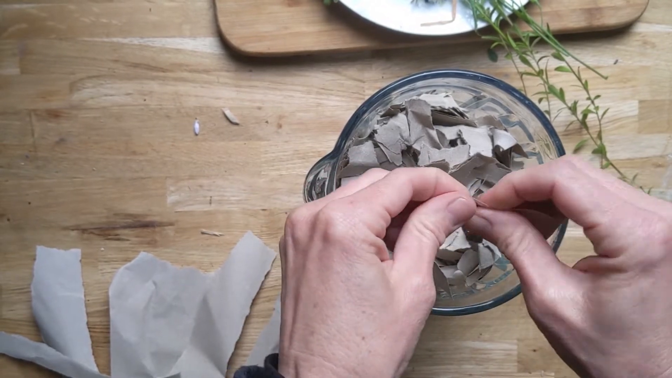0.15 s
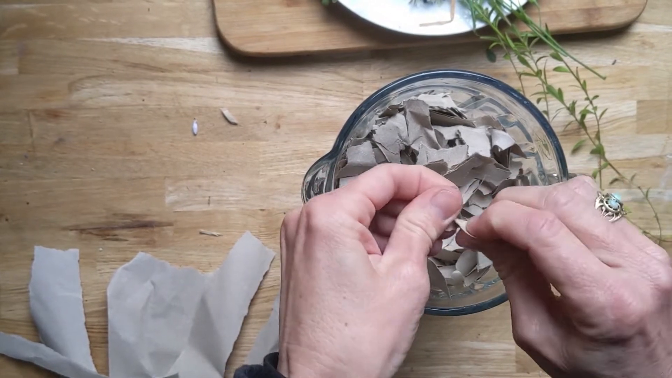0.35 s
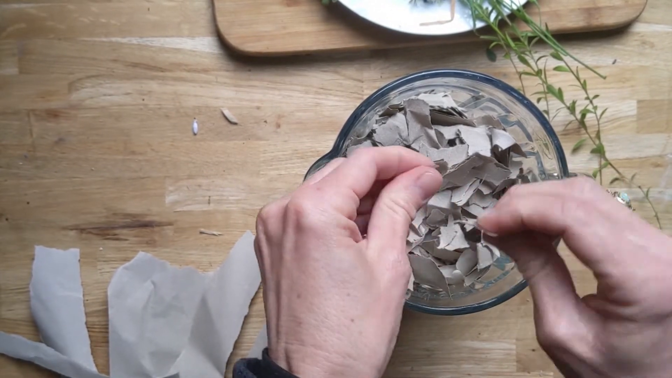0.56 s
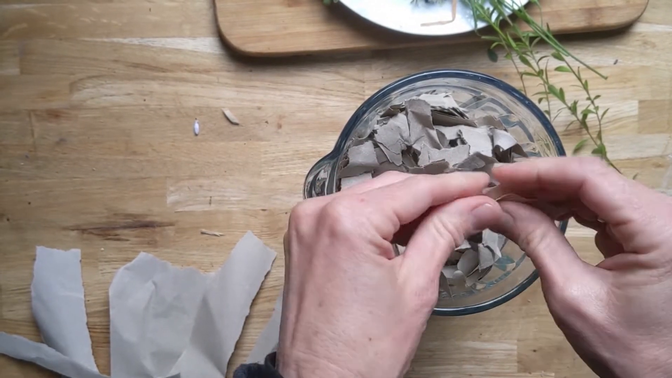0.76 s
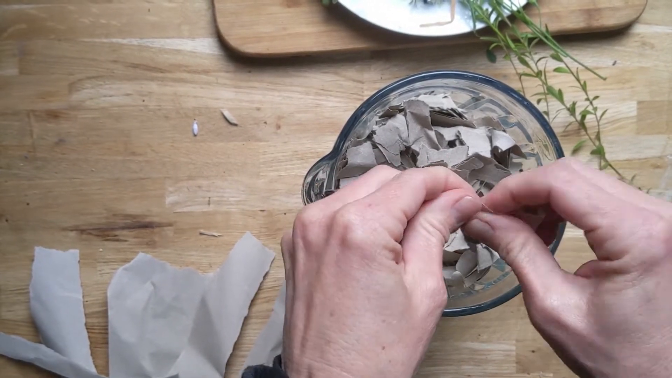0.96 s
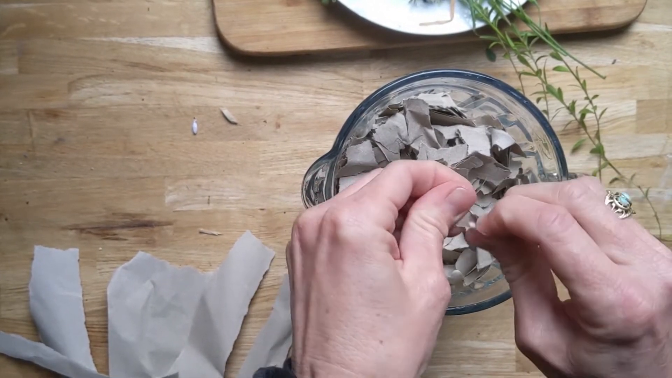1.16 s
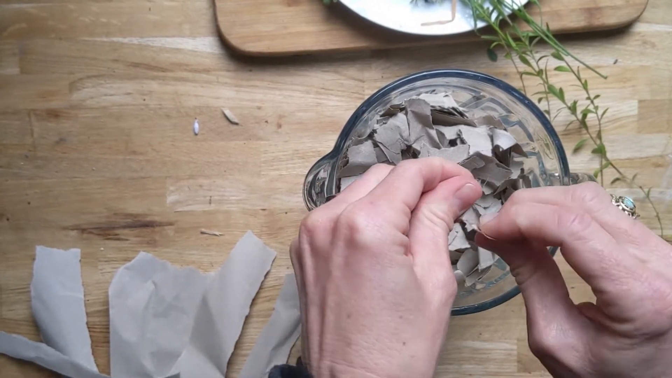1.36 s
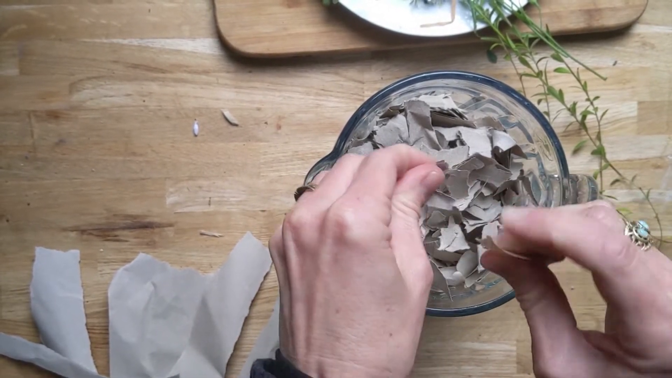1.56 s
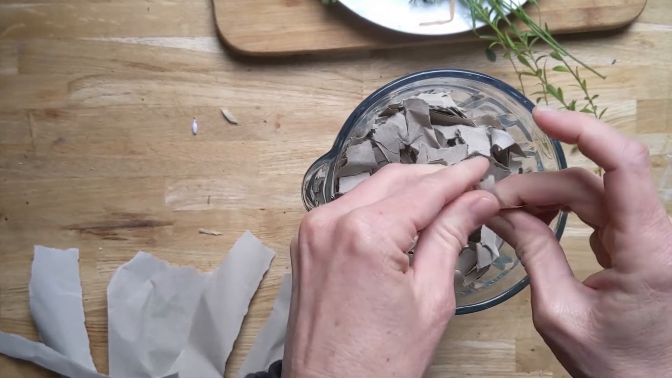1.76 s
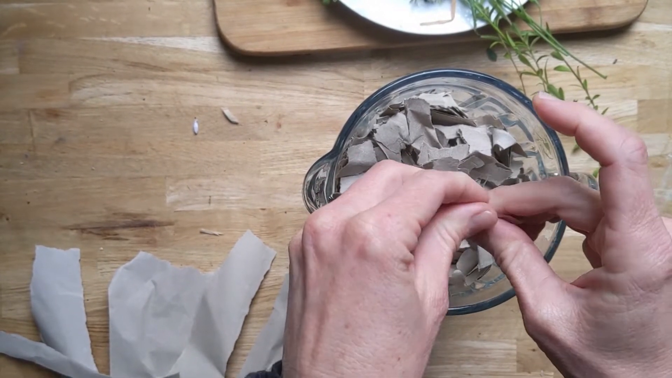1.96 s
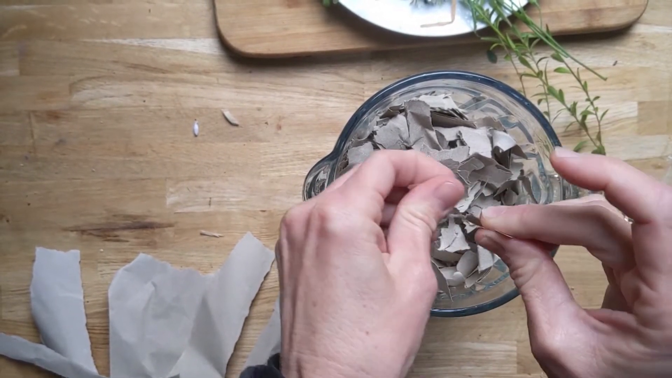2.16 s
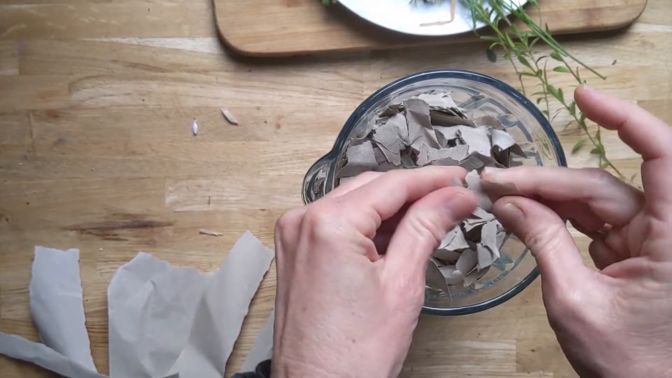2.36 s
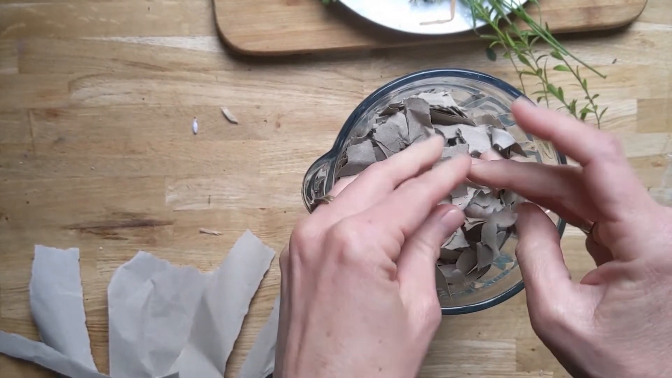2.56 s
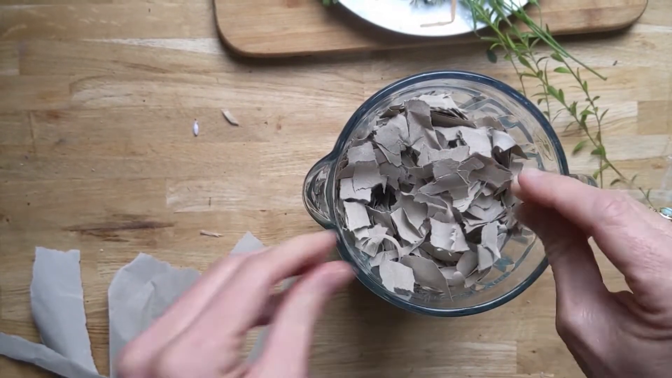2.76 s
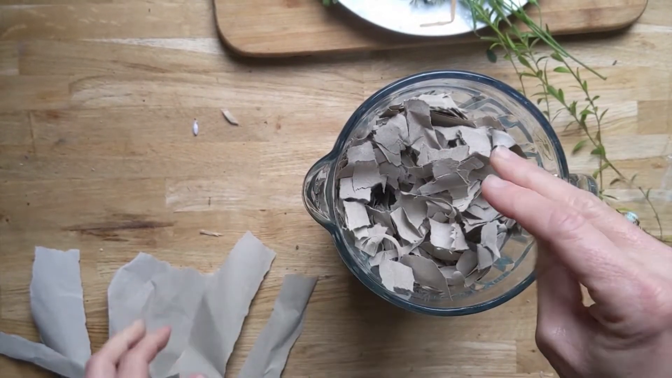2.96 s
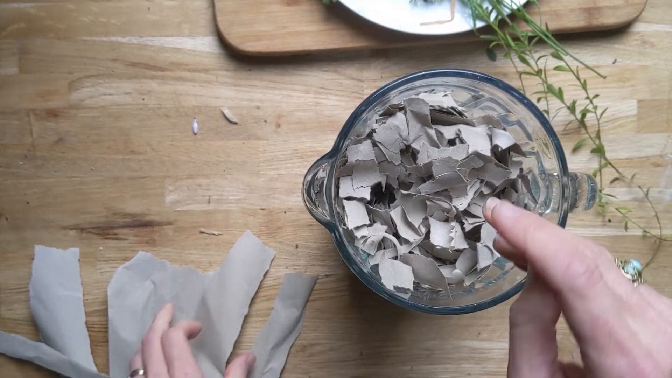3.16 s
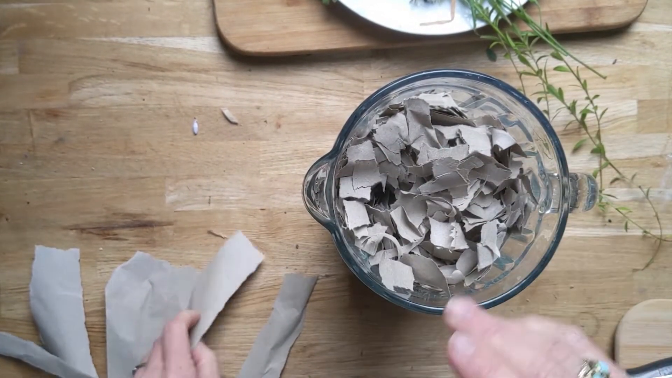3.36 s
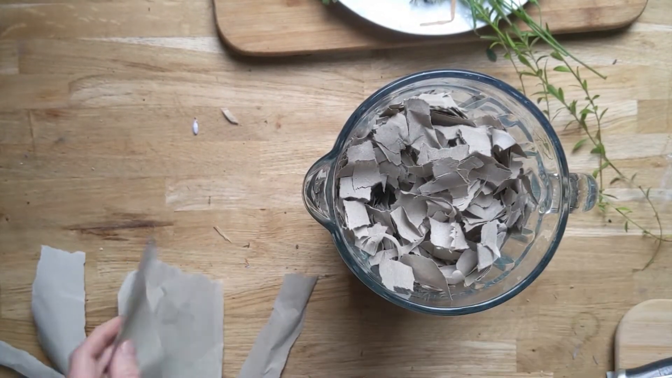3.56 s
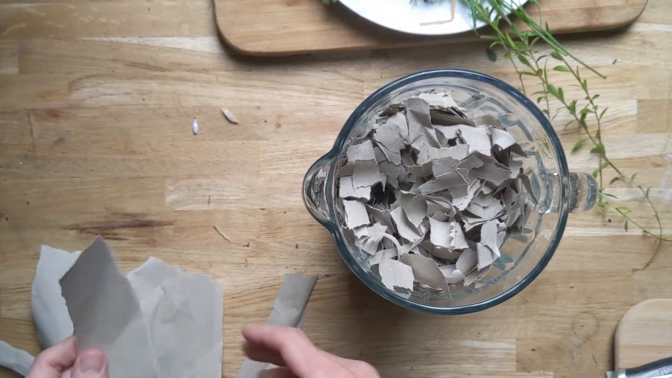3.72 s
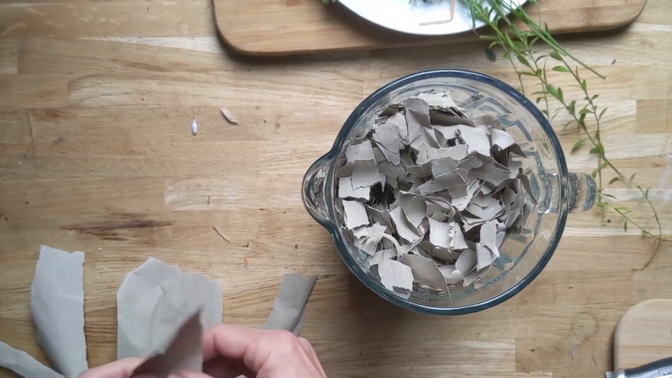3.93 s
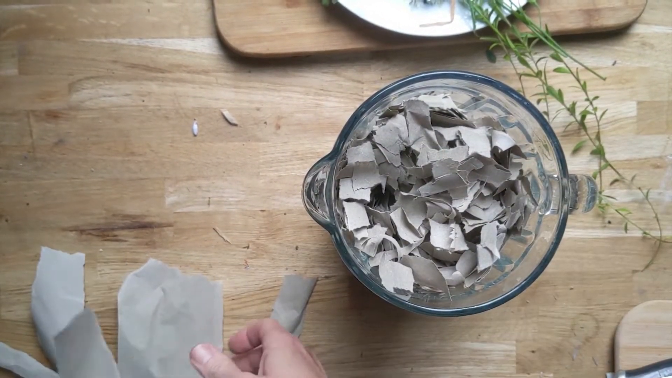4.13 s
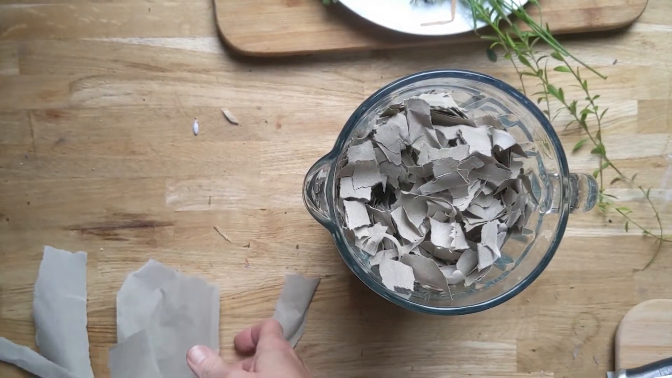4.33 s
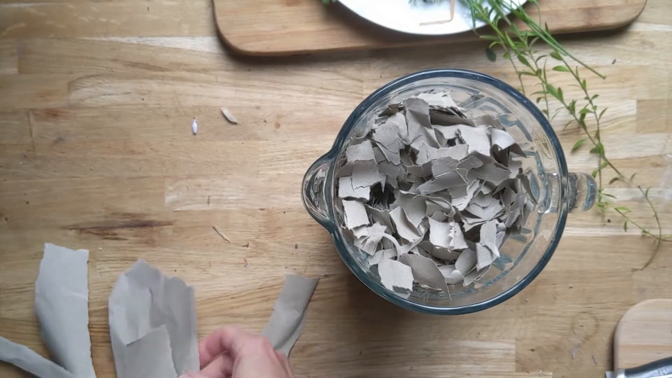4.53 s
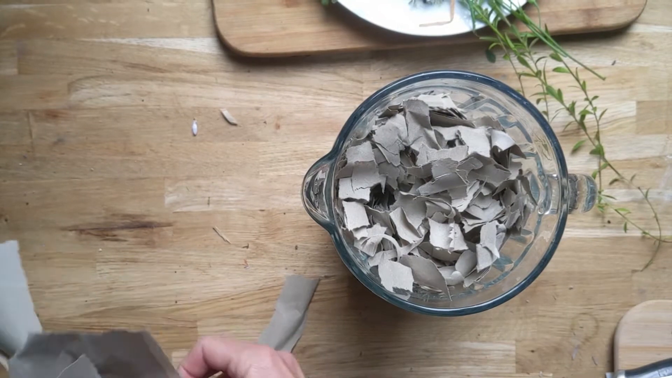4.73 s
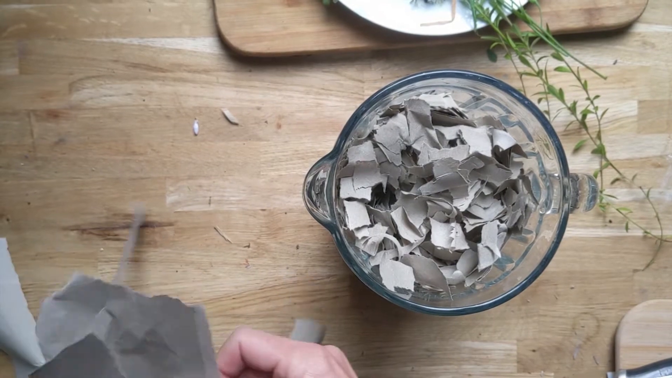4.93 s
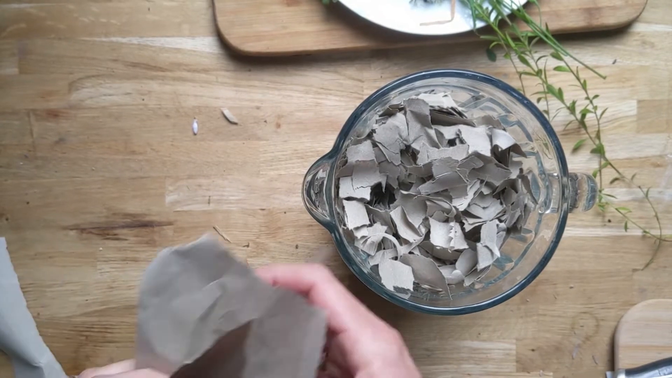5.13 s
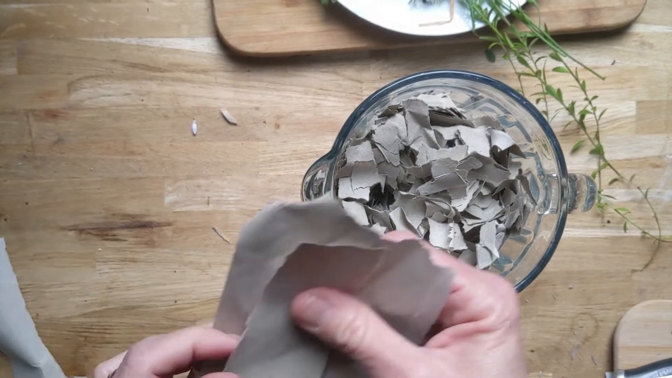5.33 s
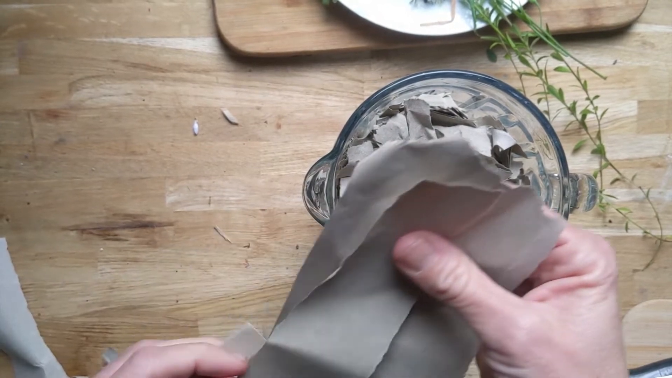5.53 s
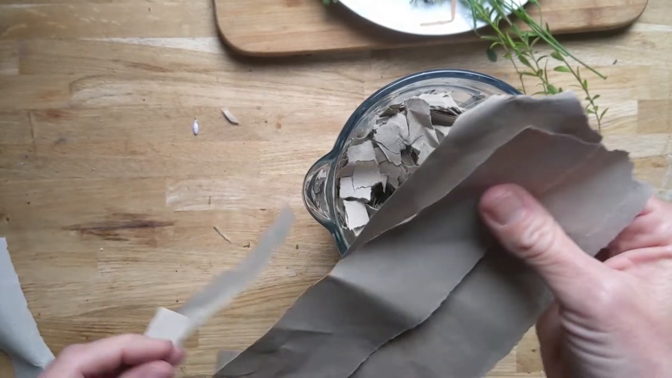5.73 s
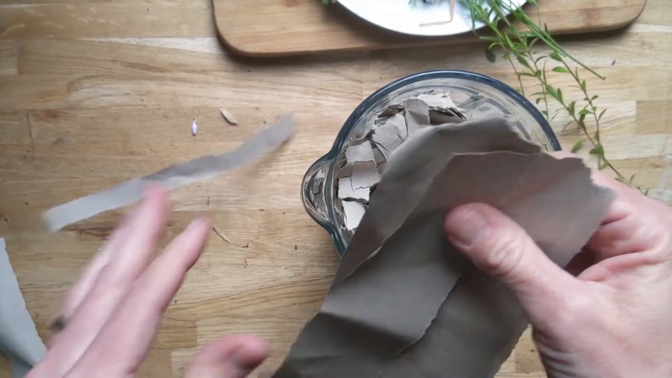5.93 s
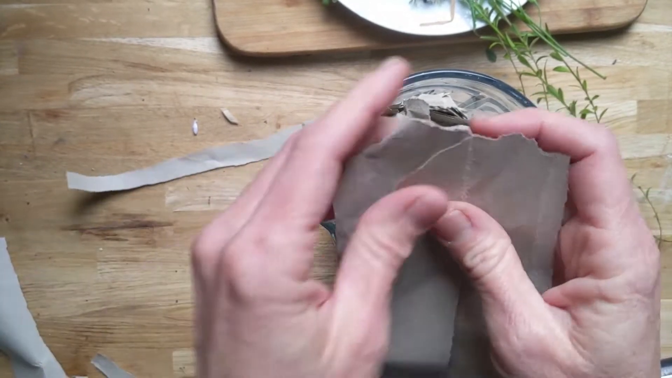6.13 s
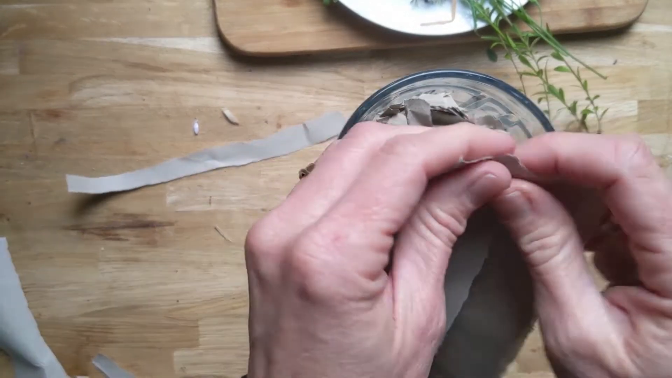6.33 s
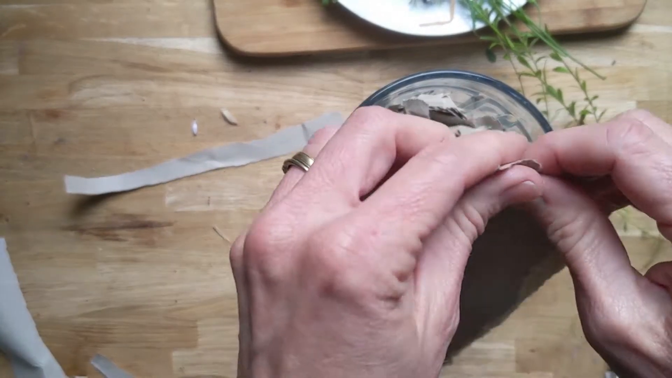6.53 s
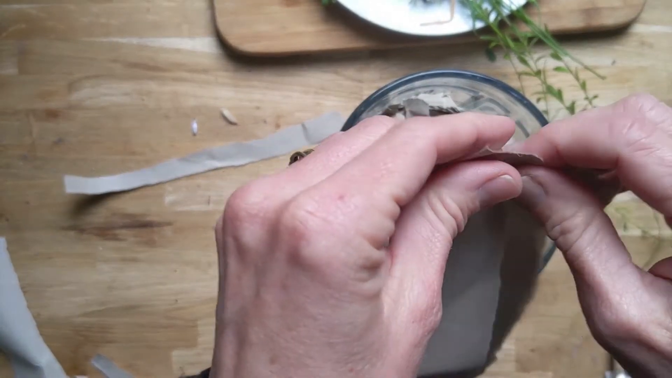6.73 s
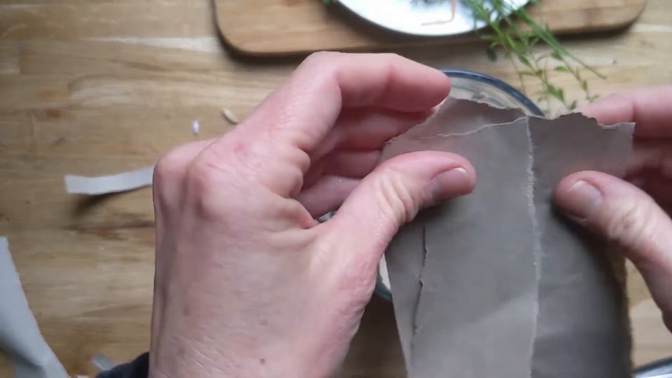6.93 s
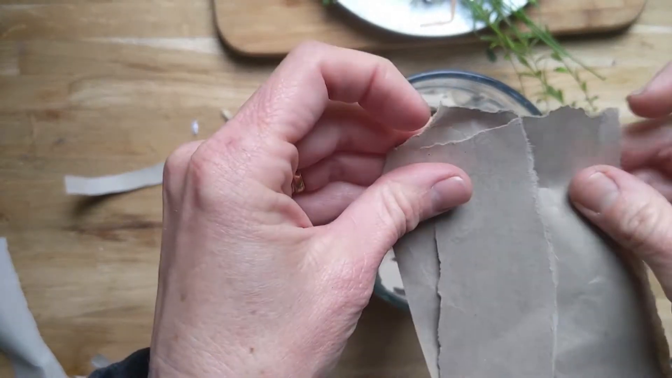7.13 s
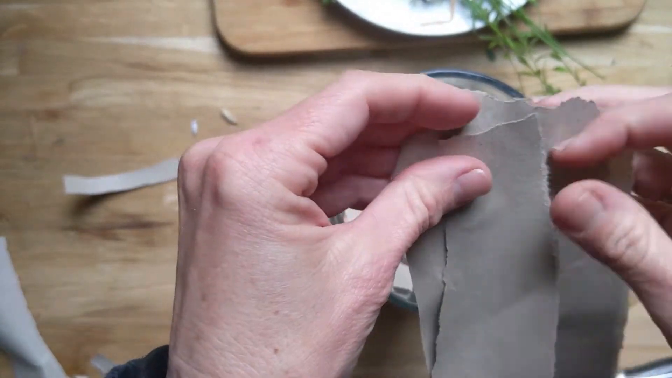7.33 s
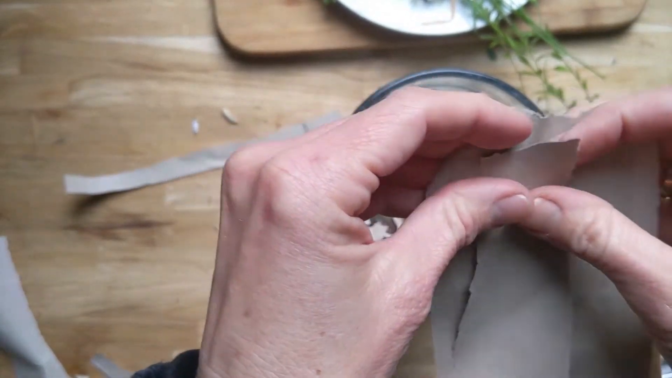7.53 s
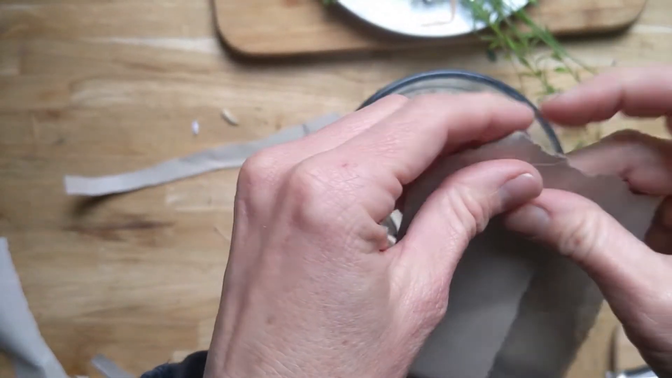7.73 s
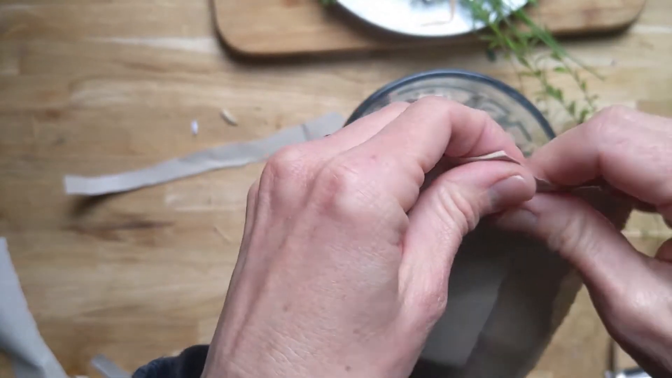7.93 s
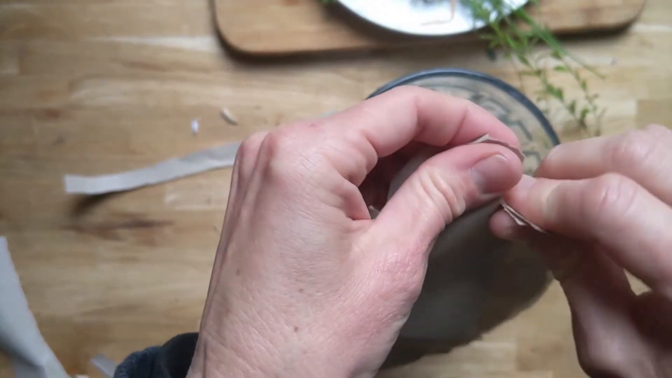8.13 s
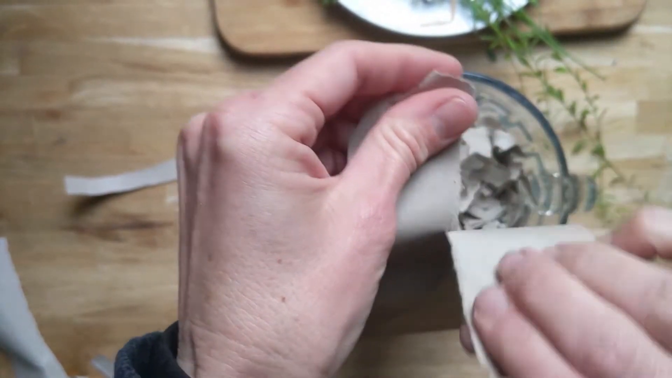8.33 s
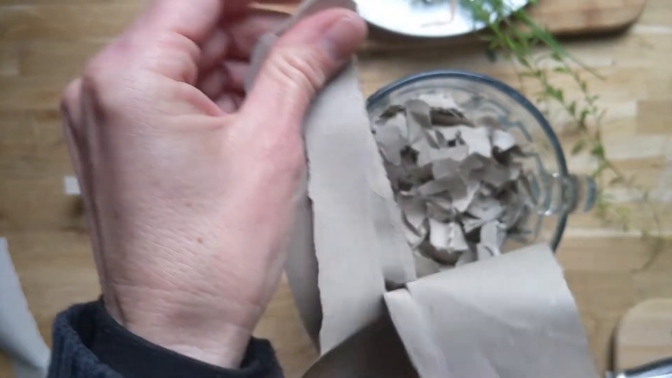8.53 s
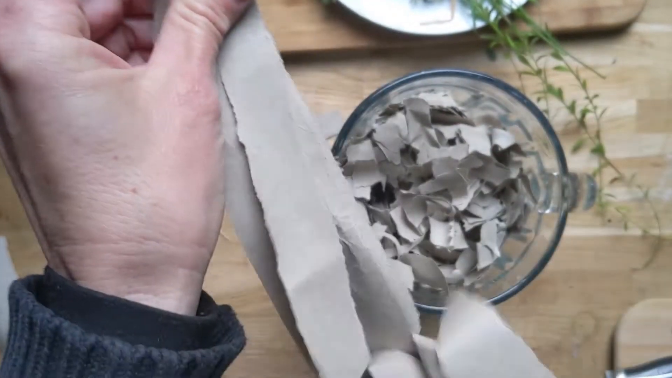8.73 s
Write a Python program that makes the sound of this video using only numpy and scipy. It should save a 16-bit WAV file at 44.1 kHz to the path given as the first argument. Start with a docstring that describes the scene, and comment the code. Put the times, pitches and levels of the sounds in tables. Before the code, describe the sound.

A close stereo phone microphone above a kitchen table, short dry room, very soft air noise and a low, faint appliance hum throughout. From 0 to 1.5 s, fingers tear small paper scraps: brief bright fizzy rips near 0.4, 1.2 and 1.4 s, with light rubbing and tiny ticks between. From 1.6 to 3.2 s it is almost silent, only faint rustles and a small tear near 2.1 s. At 3.3 s paper slides softly; from 3.9 to 5.6 s a larger sheet is picked up and bent, rustling and crinkling, with dry pops around 4.0, 4.9, 5.3 and 5.5 s. A quieter moment near 6 s, then folding: a loud crease snap at 6.85 s, dense crinkles and duller pops until 7.9 s. From about 8.2 s a long rip swells, coarse and crackling, with hard snaps at 8.4, 8.5, 8.6 and 8.8 s, still tearing at the end.

```python
"""Tearing and folding paper

Hands tear small paper scraps over a jug, pick up and fold a large sheet, then rip a long strip off it.
Snapping fibres are dense tiny clicks, filtered to the colour of paper and swelling with the hands' effort.
Creases pop as short noise jolts that ring the sheet; small dents ring its modes as crinkles.
A phone with two ports, close above the table, hears a small quiet kitchen: soft noise and an appliance hum."""
import sys
import numpy as np
from scipy import signal
from scipy.fft import rfft, irfft
from scipy.io import wavfile
from scipy.ndimage import uniform_filter1d

SR = 44100
rng = np.random.default_rng(int(sys.argv[2]) if len(sys.argv) > 2 else 0)


def convert_level_to_amplitude(level_db):
    """Map a level in decibels to its linear amplitude factor."""
    exponent = np.asarray(level_db, float) / 20
    return 10 ** exponent


def log_audio(samples):
    """Write samples as a 16-bit WAV file to the path given in sys.argv[1]."""
    # one column per channel
    frames = np.atleast_2d(samples).T
    # limit to full scale, then quantise
    limited = np.clip(frames, -1, 1)
    pcm = np.round(limited * 32767).astype(np.int16)
    wavfile.write(sys.argv[1], SR, pcm)


N = 391608

TIME_S = np.arange(N) / SR
FREQ_HZ = np.maximum(np.fft.rfftfreq(N, 1 / SR), 1)
SIDES = np.array([[1], [-1]])  # left port, right port
# ways the large sheet can ring: [f/Hz, level/dB, time to fall by 60 dB/s]
SHEET_MODES = [(567, -6, 0.018), (783, -5, 0.016), (1249, 0, 0.016), (1804, 2, 0.014), (2430, 1, 0.012),
               (3060, 0, 0.01), (4040, -1, 0.008), (4950, -7, 0.0066)]


def along(table):
    """Read a table of [f/Hz, value] at every frequency, evenly in pitch."""
    hz, value = np.transpose(table)
    return np.interp(np.log(FREQ_HZ), np.log(hz), value)


def shape(x, gain):
    """Filter a sound by a gain at every frequency."""
    return irfft(rfft(x) * gain, N)


def walk(rate):
    """Random levels that slide from one to the next, `rate` of them a second; spread near 1."""
    k = int(SR / rate)
    held = np.repeat(rng.standard_normal(N // k + 1), k)
    return 1.175 * uniform_filter1d(held, k)[:N]


def kitchen():
    """Broad room noise, alike at both ports in the bass, plus narrow wavering lines of an appliance."""
    # colour of the room noise: [f/Hz, relative level per Hz/dB]
    air_colour = [(12, -49), (24, 6.5), (34, -13), (60, 1), (88, -3.5), (123, -3), (209, -13), (335, -9),
                  (996, -19), (4140, -30), (6840, -44), (10700, -25.5), (15500, -36)]
    # how alike the noise is at the two ports: [f/Hz, likeness from 0 to 1]
    likeness = [(60, 0.9), (130, 0.76), (290, 0.6), (640, 0), (1410, -0.02), (3100, 0.1), (6820, 0),
                (15000, 0.1)]
    # appliance hum lines: [f/Hz, level/dB, width/Hz, steady share of the power from 0 to 1]
    hum = [(45.3, -66, 2.5, 0.94), (115, -74, 16, 0.53), (132, -75, 9.3, 0.4), (171.3, -80.5, 4.2, 0.6),
           (265, -80.5, 8.9, 0.53), (339, -75.5, 14, 0.2), (583, -85, 7, 0.3)]
    like = np.clip(along(likeness), 0, 1)
    mid, side, buzz = rfft(rng.standard_normal((3, N)))
    both = np.sqrt(1 + like) * mid + SIDES * np.sqrt(1 - like) * side
    air = irfft(convert_level_to_amplitude(along(air_colour)) * both, N)
    out = air * convert_level_to_amplitude(-65.5) / np.sqrt(np.mean(air ** 2))
    lines = 0
    for hz, db, width, share in hum:
        share = np.clip(share, 0, 1)
        peak = 1 / (1 + ((FREQ_HZ - hz) / width * 2) ** 2)
        # part of each line is narrow noise, the rest a tone with a wandering phase
        lines = lines + convert_level_to_amplitude(db) * np.sqrt((1 - share) / np.mean(peak ** 2)) * peak
        tone = np.sin(2 * np.pi * hz * TIME_S + 1.23 * walk(3.9))
        out = out + convert_level_to_amplitude(db) * np.sqrt(2 * share) * tone
    return out + irfft(buzz * lines, N)


def room(x):
    """Table, hands and walls: a short diffuse tail, different at each port, redrawn every 1/8 s."""
    t, hop = np.arange(SR // 4) / SR, SR // 8
    # a strong quick fall and a weak slower one, both after a 1.2 ms gap
    fall = (1000 ** (-t / 0.025) + convert_level_to_amplitude(-19) * 1000 ** (-t / 0.2)) * (t > .0012)
    high = signal.butter(1, 500., "high", fs=SR, output="sos")
    fade = np.sin(np.pi * np.arange(2 * hop) / (2 * hop))
    padded = np.pad(x, ((0, 0), (hop, 2 * hop)))
    wet = np.zeros((2, N + 4 * hop + len(t)))
    for k in range(0, N + hop, hop):
        tail = signal.sosfilt(high, rng.standard_normal((2, len(t))) * fall)
        tail /= np.sqrt(np.sum(tail ** 2, axis=1, keepdims=True))
        piece = signal.fftconvolve(padded[:, k:k + 2 * hop] * fade, tail, axes=1)
        wet[:, k:k + piece.shape[1]] += piece
    return x + convert_level_to_amplitude(-4.5) * wet[:, hop:hop + N]


def bands():
    """Split the paper's colour into high, middle and low parts, each brought to the same power."""
    # colour of one fibre snap: [f/Hz, relative level per Hz/dB]
    paper = [(70, -19.5), (200, -15), (400, -13.5), (750, -9.5), (1100, -10), (1800, -4.5), (3600, 1),
             (5500, -1), (7600, -3), (9500, 3.5), (12000, 6.5), (15500, 2.5)]
    below_low, below_high = [1 / (1 + (FREQ_HZ / hz) ** 4) for hz in (1500, 6500)]
    colour = convert_level_to_amplitude(along(paper))
    parts = [colour * p for p in (1 - below_high, below_high - below_low, below_low)]
    return [p / np.sqrt(np.mean(p ** 2)) for p in parts]


def snaps(per_s, spread_db, lag_ms):
    """Scattered clicks of very uneven size; each breaks at its own spot, so its lag between ports differs."""
    # where the hands work: [t/s, lag of the left port/ms, left minus right level/dB]
    place = [(0, -0.0065, -1.5), (2.3, 0.039, -1), (3.198, -.13, -1), (4.8, -0.14, 0.5), (6.2, 0, -2),
             (8.88, -0.057, 0)]
    chance = rng.random((int(per_s * N / SR), 4))
    at = chance[:, 0] * (N - 40) + 20
    size = np.sign(chance[:, 1] - .5) * convert_level_to_amplitude(-spread_db * np.log(1 - .995 * chance[:, 2]))
    size /= np.sqrt(np.sum(size ** 2) / N)
    s, hands_ms, pan_db = np.transpose(place)
    lag = (np.interp(at / SR, s, hands_ms) + lag_ms * (chance[:, 3] - .5)) * SR / 1000
    pan_db = np.interp(at / SR, s, pan_db)
    ports = [np.bincount((at + side * lag).astype(int), size * convert_level_to_amplitude(side * pan_db), N)
             for side in (.5, -.5)]
    return np.array(ports)


def rips():
    """Short rips and rustles of scraps and sheet: sharp snaps start at once, swell and die."""
    # rips and rustles: [t/s, fizz level/dB, sheet crackle level/dB, swell/ms, fade/ms]
    bursts = [(0.069, -49, -58, 1.5, 5), (.118, -53, -61, 1, 5), (0.256, -46, -49, 1, 15),
              (.292, -42, -57, 1, 10), (0.423, -31.5, -45, 27, 5), (0.743, -46.5, -49, 2, 4.9),
              (1.022, -40, -53, 1, 4), (1.032, -40.5, -52, 5.4, 12), (1.098, -46.5, -57, 2, 6.7),
              (1.167, -29.5, -48, 13.6, 3.9), (1.312, -54, -72, 1, 10), (1.431, -33, -45.5, 21.4, 5.7),
              (.958, -56, -54, 3, 6), (1.78, -61, -78, 4, 11), (1.826, -61, -72, 1, 25),
              (1.899, -55, -59, 2, 6), (1.935, -57, -64, 2, 10), (2.117, -42.5, -47.5, 1.1, 6.2),
              (2.13, -48, -60, 8, 8.1), (2.148, -49, -58, 6, 6), (2.31, -60, -74, 3, 40),
              (4.421, -28.5, -41, 1.6, 4.2), (6.979, -39.5, -63, 1, 4.9), (8.04, -36.5, -51, 3.3, 11),
              (8.771, -33, -27.5, 1, 12)]
    clicks = snaps(3000., 3.0, .2) + convert_level_to_amplitude(-20) * rng.standard_normal((2, N))
    fizz, crackle = np.zeros((2, N))
    for s, fizz_db, crackle_db, swell_ms, fade_ms in bursts:
        start = int(s * SR)
        span = slice(start, start + SR // 4)
        ms = 1000 * (TIME_S[span] - s) - swell_ms  # time from the loudest moment
        env = np.exp(np.where(ms < 0, ms / 12.5, -ms / max(fade_ms, 1)))
        fizz[span] += env * convert_level_to_amplitude(fizz_db)
        crackle[span] += env * convert_level_to_amplitude(crackle_db)
    high, mid, _ = bands()
    return irfft(rfft(clicks * fizz) * high + rfft(clicks * crackle) * mid, N)


def pops():
    """A crease buckles in a brief ragged jolt: bright crack, ring at its own pitch, sheet modes, puff of air."""
    # popping creases: [t/s, peak level of the body/dB, ring f/Hz, crack relative to body/dB,
    # time for the jolt to peak/ms, time for the ring to fall by 60 dB/ms]
    creases = [(0.901, -46, 2250, -1, .6, 8), (0.932, -52, 1700, 2, 2, 10), (.939, -45, 1900, 2, 0.56, 8),
               (1.457, -33.5, 4770, 0.5, 0.7, 10), (1.965, -53, 1800, 2, 1, 10),
               (2.007, -53, 3000, 0, 0.87, 10), (2.024, -47.5, 3950, -9, .8, 15),
               (3.562, -41.5, 970, 0, 0.69, 15), (3.908, -46, 425, 0, 0.68, 15),
               (4.019, -28, 1620, 3, 0.53, 7), (4.03, -40, 1700, 0, 2.6, 15), (4.067, -37, 1510, 0, .5, 8),
               (4.081, -33, 1010, 7, 0.81, 7), (4.202, -42, 503, 5, 2.5, 9.2),
               (4.236, -41, 550, -19, 4.3, 18), (4.38, -47, 583, -10, 3, 27),
               (4.421, -38, 4970, -17, 0.56, 15), (4.472, -40, 1900, -6, .8, 12),
               (4.757, -42.5, 1200, -8, 1.6, 22), (4.882, -27.5, 2810, -0.5, 1.4, 11),
               (4.994, -37.5, 5470, -4, .6, 16), (5.245, -43, 800, -5, .6, 16),
               (5.261, -30.5, 3290, -4, .6, 15), (5.272, -25, 3440, 3.5, 0.59, 12),
               (5.388, -34, 900, 0, 1.5, 15), (5.458, -40, 300, -10, 0.9, 17), (5.464, -21, 820, 2, .8, 14),
               (6.008, -43, 318, -3, 0.52, 18), (6.251, -40, 1730, -10, .6, 17),
               (6.506, -39, 1230, -3, .6, 17), (6.531, -26, 1330, 2, 0.75, 17),
               (6.605, -40, 910, -9, .6, 17), (6.85, -16, 3220, 1.5, 0.74, 8.4),
               (6.899, -31.5, 2380, 0, 1, 15), (7.019, -43, 1740, -11, 2, 60),
               (7.078, -46, 400, -9, .6, 12), (7.105, -27.5, 1250, -10, 2, 53),
               (7.19, -40, 290, -19, 0.89, 14), (7.258, -42.5, 2420, 1, 1.5, 25),
               (7.28, -40.5, 320, -12, 1, 16), (7.286, -32.5, 2590, -5, 2, 12),
               (7.374, -28, 1390, 5, 1.2, 8), (7.377, -31.5, 457, -18, 1.5, 22),
               (7.41, -45, 260, -9, 0.67, 17), (7.51, -44, 750, -5, 4, 30), (7.556, -41, 1100, -3, 1, 10),
               (7.584, -22.5, 1480, -11, 0.35, 6), (7.597, -40, 900, -5, 1.5, 12),
               (7.632, -41, 1600, -3, 1.5, 10), (7.65, -37.5, 605, 0, 1.1, 14),
               (7.81, -32, 1204, -6, 0.63, 12), (7.929, -20, 2670, 0, .5, 7),
               (8.042, -31.5, 3710, 2.5, 0.93, 15), (8.177, -37, 1300, -2, 0.54, 20),
               (8.413, -23, 1910, -8, 2, 17), (8.516, -16, 3860, -3, .3, 10),
               (8.617, -22, 2370, -5, .6, 12), (8.771, -16.5, 2840, 0, .7, 10)]
    out, t = np.zeros((2, N + 4410)), np.arange(4410) / SR
    hz, db, t60 = np.transpose(SHEET_MODES)[:, :, None]
    bright = signal.butter(1, [500., 5500.], "band", fs=SR, output="sos")
    puff = np.sin(2 * np.pi * 184.0 * t) * t / 0.003 * np.exp(-t / 0.0022) * np.e
    for s, peak_db, ring_hz, crack_db, jolt_ms, ring_ms in creases:
        chance = rng.standard_normal((2, len(SHEET_MODES), 1))
        noise = rng.standard_normal((5, len(t)))
        rise = 1000 * t / jolt_ms
        jolt = noise[:3] * rise * np.exp(1 - rise) * 0.2
        # modes close to the ring are driven most; each grip retunes them
        near = convert_level_to_amplitude(db + 2.1 * chance[0] - 1.94 * np.abs(np.log2(hz / ring_hz)))
        mode_hz = hz * 2 ** (0.25 * chance[1])
        modes = near * np.sin(2 * np.pi * mode_hz * t) * 1000 ** (-t / t60)
        tone = np.sin(2 * np.pi * ring_hz * t)
        ring = tone * (1 - np.exp(-rise)) * 1000 ** (-1000 * t / ring_ms)
        push = tone * np.exp(-1.3 * ring_hz * t)  # one or two cycles
        jolted = signal.fftconvolve(jolt[1:], [push, modes.sum(0)], axes=1)[:, :len(t)]
        parts = [part / np.abs(part).max() for part in (ring, *jolted)]
        body = convert_level_to_amplitude([-4, -1, -5]) @ parts
        # a small crease moves no bass
        high = signal.butter(2, 0.28 * ring_hz, "high", fs=SR, output="sos")
        body = signal.sosfilt(high, body)
        rattle = convert_level_to_amplitude(-22) * noise[3:] * np.exp(-t / 0.0066)  # the sheet rattles on briefly
        crack = signal.sosfilt(bright, jolt[0] + .5 * jolt[1:] + rattle)
        body = body / np.abs(body).max()
        crack = convert_level_to_amplitude(crack_db) * crack / np.abs(crack).max()
        k = int(s * SR)
        out[:, k:k + len(t)] += (body + crack + convert_level_to_amplitude(-24) * puff) * convert_level_to_amplitude(peak_db)
    return out[:, :N]


def resonate(x, hz, t60):
    """A mode that dies away, retuned every 60 ms as the sheet bends."""
    r, state, out = 1000 ** (-1 / (t60 * SR)), np.zeros((2, 2)), []
    for piece in np.array_split(x, N // 2646, axis=1):
        w = 2 * np.pi * hz / SR * 2 ** (0.34 * rng.standard_normal())
        feed, back = [np.sin(w) * np.sqrt(1 - r)], [1, -2 * r * np.cos(w), r * r]
        y, state = signal.lfilter(feed, back, piece, zi=state)
        out.append(y)
    return np.concatenate(out, axis=1)


def crinkles(level_db):
    """Small dents flick over here and there; each mode of the sheet rings to dents of its own."""
    gain = convert_level_to_amplitude(level_db)
    return sum(resonate(snaps(130., 4.66, 0.25) * gain * convert_level_to_amplitude(db), hz, t60)
               for hz, db, t60 in SHEET_MODES)


def effort():
    """Levels in dB of fizz, crackle, flap and slack crackle: fidgets, strokes and tear add as powers."""
    # fingers never quite rest on the paper: [t/s, fibre fizz level/dB, sheet crackle level/dB]
    fidget = [(0, -66, -71), (.7, -80, -74.5), (1.3, -93, -81), (2.3, -77, -77), (3.2, -82, -82),
              (3.3, -66, -56.5), (3.75, -63, -71), (3.81, -74, -75), (4.0, -66, -56.5), (4.26, -80, -65.5),
              (4.5, -73, -54), (4.95, -70, -58), (5.15, -70, -67.5), (5.4, -53.5, -57), (5.6, -57, -56.5),
              (5.66, -76, -90), (6.0, -63.5, -61.5), (6.8, -67, -65.5), (7.2, -86, -66), (8.88, -73, -60)]
    # finger or sheet stroking paper: [t of peak/s, fizz level/dB, crackle relative to fizz/dB, swell/s, fade/s]
    rubs = [(.08, -62, -12, .15, 0.13), (.36, -45.5, -21.5, 0.067, 0.092), (.594, -54, -15, 0.078, 0.045),
            (.863, -58.5, -13, 0.26, 0.19), (.95, -53.5, -4.5, 0.08, 0.03),
            (1.053, -51.5, -11, .045, 0.088), (1.212, -62, -11.5, 0.17, 0.057),
            (1.325, -60, -19, 0.022, 0.16), (1.46, -60, -8, 0.085, 0.059),
            (1.646, -51.5, -19.5, 0.039, 0.065), (1.79, -68.5, -21, 0.027, 0.81),
            (2.02, -66.5, -1.5, 0.28, 0.047), (2.335, -61, -14, 0.028, 0.13),
            (2.704, -72.5, -5.5, 0.15, 0.43), (3.033, -69.5, -12.5, 0.06, 0.14),
            (3.271, -47.5, -7, 0.019, 0.17), (3.385, -47, -5, 0.049, 0.12), (3.85, -64.5, -7, 0.074, .2),
            (3.94, -47, -9.5, 0.033, 0.15), (4.171, -55.5, -12, .1, 0.05), (4.34, -52.5, -1, .07, 0.27),
            (4.45, -46, -11, 0.054, 0.045), (4.58, -51.5, 2, 0.063, 0.17), (4.759, -49.5, 1.5, 0.092, 0.11),
            (5.038, -49.5, -2.5, 0.086, 0.087), (5.265, -51, 8.5, 0.012, 0.061),
            (5.49, -54.5, 8.5, 0.075, 0.042), (5.56, -50, 1.5, 0.085, 0.053), (5.797, -62.5, -2, .13, 0.14),
            (5.89, -58.5, -28, 0.12, 0.033), (6.34, -49, 0.5, 0.2, 0.054), (6.51, -60, 0, 0.11, 0.18),
            (6.64, -58, -1.5, 0.34, 0.25), (6.884, -50, 0, 0.17, 0.21), (6.975, -48.5, -19, 0.14, 0.031),
            (7.159, -57.5, -0.5, 0.11, 0.029), (7.3, -58, 3.5, 0.081, 0.09), (7.513, -56, 0, 0.072, 0.24),
            (7.623, -54.5, 1.5, 0.27, 0.073), (7.822, -53.5, -9, 0.31, 0.1),
            (8.067, -50.5, -7, 0.022, 0.066), (8.15, -51, -13, 0.1, 0.044)]
    # the long tear: [t/s, fibre fizz level/dB, sheet crackle level/dB]
    tear = [(8.15, -67, -74), (8.186, -43, -48.5), (8.221, -41, -40), (8.286, -45, -37.5),
            (8.326, -40, -39.5), (8.39, -36, -38.5), (8.41, -33.5, -34.5), (8.45, -32, -31.5),
            (8.496, -28, -29.5), (8.566, -32.5, -34.5), (8.63, -30.5, -29.5), (8.705, -35.5, -35),
            (8.805, -34.5, -29.5), (8.88, -35, -33)]
    stroke_range_db = 15  # gained in the swell time, lost in the fade time
    flap_db, taut_flap_db = -8.5, -12  # flap of the whole sheet below its crackle, slack and pulled taut
    t = np.arange(0, N / SR + .004, .002)

    def powers(table):
        """Fizz and crackle powers of a table, near silent before its first row."""
        s, *levels = np.transpose(table)
        return convert_level_to_amplitude(np.array([np.interp(t, s, db, left=-120) for db in levels])) ** 2

    s, fizz_db, crackle_db, swell, fade = np.transpose(rubs)[:, :, None]
    stroke_db = fizz_db - stroke_range_db * np.where(t < s, (s - t) / swell, (t - s) / fade)
    strokes = np.array([np.sum(convert_level_to_amplitude(stroke_db + db) ** 2, axis=0) for db in (0, crackle_db)])
    loose, taut = powers(fidget) + strokes, powers(tear)
    flap = loose[1] * convert_level_to_amplitude(flap_db) ** 2 + taut[1] * convert_level_to_amplitude(taut_flap_db) ** 2
    return [np.interp(TIME_S, t, 10 * np.log10(power)) for power in (*(loose + taut), flap, loose[1])]


def handling():
    """Fingers and sheets rubbing and the long tear: dense snaps that come in flurries."""
    # how the sheet is held: [t/s, dull minus bright crackle/dB, extra flap level/dB]
    grip = [(3.2, -1.5, -0.5), (4.0, 0, 1), (4.4, 2, 0), (4.6, 7, 2), (4.72, 2, -0.5), (5.1, -0.5, 1.5),
            (5.5, -4, 2), (6.2, -1.5, 1), (7.0, 1, 1), (7.6, 1.5, 1), (8.1, -4, 2), (8.3, 1.5, 2.5),
            (8.43, 4, 1), (8.52, 0.5, 0), (8.63, 3.5, 2.5), (8.88, -3.5, 1.5)]
    *levels, loose_db = effort()
    s, *held = np.transpose(grip)
    dull_db, flap_db = (np.interp(TIME_S, s, db) for db in held)
    levels[2] = levels[2] + flap_db
    # big breaks grow, by up to 3 dB, when the sheet is pulled to tear
    break_db = 3 * (1 - convert_level_to_amplitude(loose_db - levels[1]))
    fine, coarse = snaps(8000., 2.6, .3), snaps(500., 2.54, 0.27)
    flurry = convert_level_to_amplitude(0.95 * walk(40.) + 2.2 * walk(150.))
    layers = []
    # bigger breaks move more of the sheet, so they count more from fizz to flap
    for db, coarse_db, band in zip(levels, (-9, -6, -5), bands()):
        clicks = fine + convert_level_to_amplitude(coarse_db + break_db) * coarse
        layers.append(shape(clicks * flurry * convert_level_to_amplitude(db + 1.2 * walk(30.)), band))
    fizz, crackle, flap = layers
    # bending shifts the crackle's colour between its dull and bright halves
    dull = shape(crackle, 1 / (1 + (FREQ_HZ / 3000.0) ** 4))
    tilt_db = dull_db / 2 + 2.3 * walk(14.)
    tilted = dull * convert_level_to_amplitude(tilt_db - 0.85) + (crackle - dull) * convert_level_to_amplitude(-tilt_db - 0.8)
    return fizz + tilted + flap + crinkles(loose_db - 7.5)  # only slack paper crinkles


def scene():
    """All paper sounds share the room; the kitchen lies beneath them."""
    return room(handling() + rips() + pops()) + kitchen()


def top_cut(x):
    """Nothing passes above the cut-off."""
    return signal.sosfilt(signal.butter(12, 17020, fs=SR, output="sos"), x)


def record(dry):
    """The phone's case shades one port, differently at each frequency; the top above 15750 Hz is cut."""
    # balance of the two ports: [f/Hz, left minus right level/dB]
    ports = [(60, 1.0), (110, -0.5), (200, 1), (380, 1), (700, 0.5), (1290, 0.5), (2380, 2), (4400, 3),
             (8120, -1.5), (15000, -10)]
    shading = convert_level_to_amplitude(SIDES * along(ports) / 2)
    mix = shape(dry, shading * (FREQ_HZ < 15750))
    return top_cut(mix)


dry = scene()
out = record(dry)
log_audio(out)
```